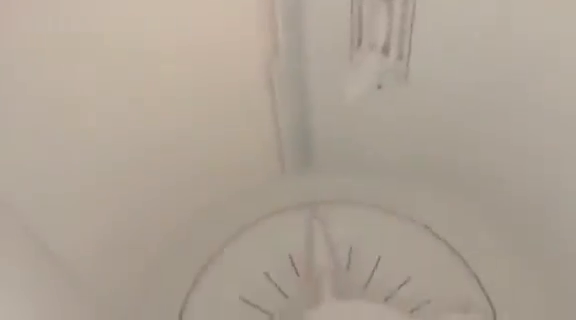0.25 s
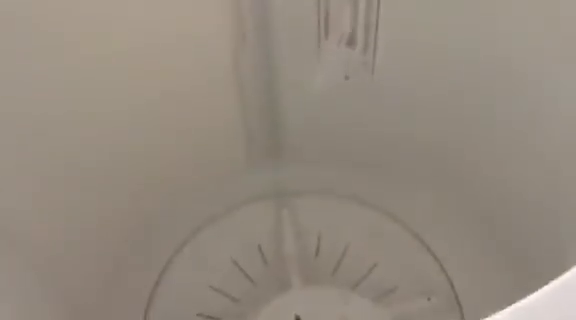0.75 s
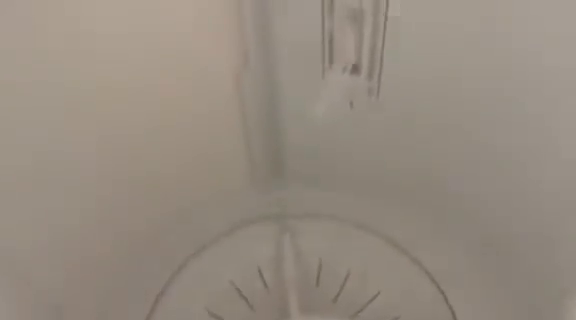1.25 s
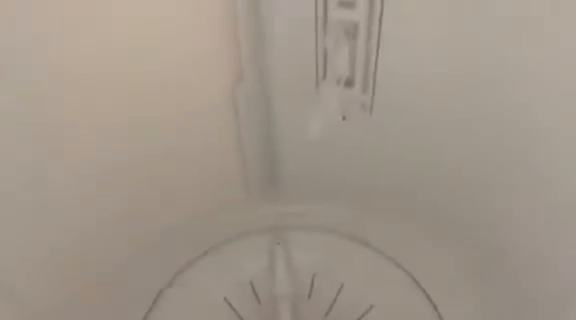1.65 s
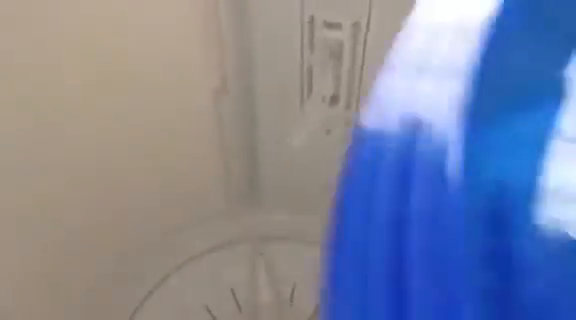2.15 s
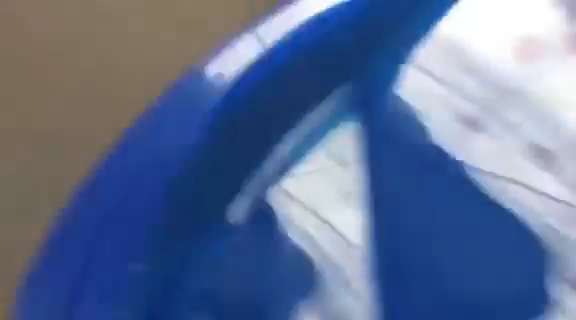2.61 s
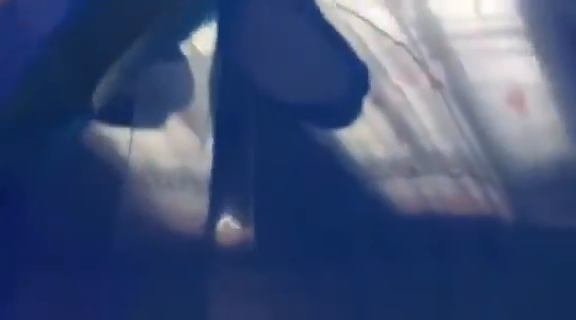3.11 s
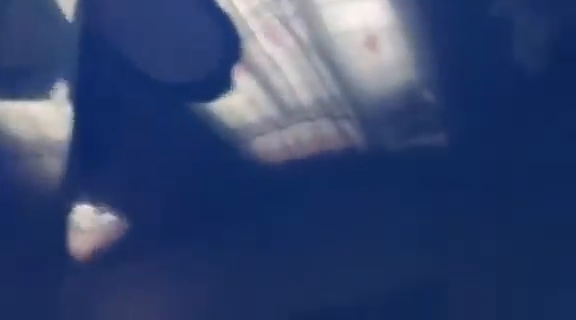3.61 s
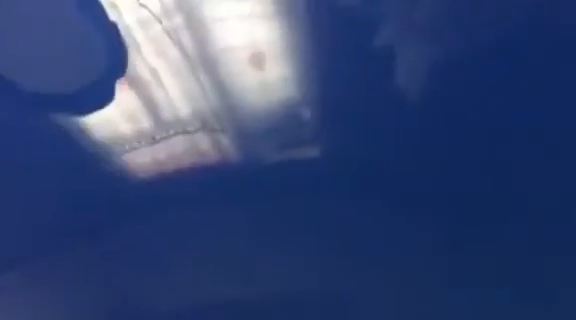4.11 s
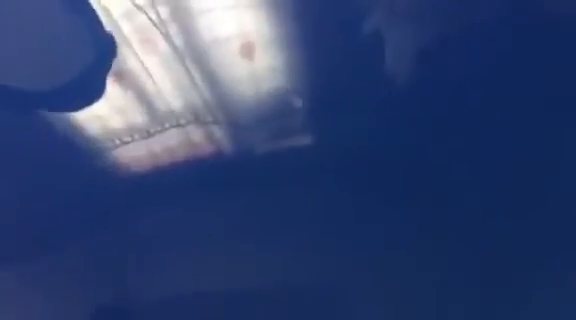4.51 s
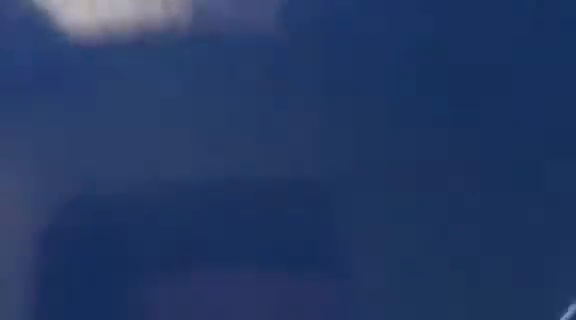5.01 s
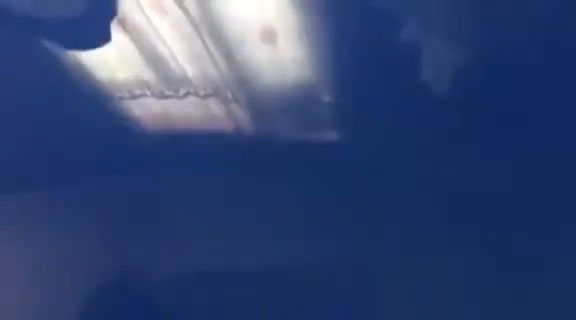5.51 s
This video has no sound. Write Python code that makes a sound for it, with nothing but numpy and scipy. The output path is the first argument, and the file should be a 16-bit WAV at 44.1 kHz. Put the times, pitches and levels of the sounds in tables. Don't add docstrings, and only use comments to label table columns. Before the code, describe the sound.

Faint distant rooster crows over a low hum, then hard plastic knocks, hollow tub thumps and scraping close to the microphone.

```python
import sys
import numpy as np
from scipy import signal
from scipy.io import wavfile
from scipy.ndimage import uniform_filter1d

SR = 44100
rng = np.random.default_rng(int(sys.argv[2]) if len(sys.argv) > 2 else 0)


def store_pcm(level_fs):
    pcm = np.round(np.clip(level_fs, -1, 1) * 32767).astype(np.int16)
    wavfile.write(sys.argv[1], SR, np.atleast_2d(pcm).T)


def level_to_linear(level):
    exponent = np.asarray(level, float) / 20
    return 10 ** exponent


N = 253575

# start_s, crack_level_db (rms of the first 10 ms), panel_share_db, rim_share_db,
# edge_share_db
HARD_KNOCKS = [(1.259, -29.5, -43, -7, -14), (2.141, -14.5, -45, -14.5, -21),
               (2.354, -14, -15.5, -15.5, -41), (2.443, -16, -13, -4.5, -13), (2.563, -16.5, -4, -22, -61),
               (3.876, -26, -8, 8, -10), (4.116, -22.5, -25, -10, -48), (4.189, -23.5, -7, -47, -52),
               (4.865, -17, -24, -14, -57), (5.166, -12, -25, -28, -45), (5.505, -16, -22, -16, -58)]
# start_s, crack_level_db (rms of the first 10 ms), panel_share_db, rim_share_db
LIGHT_TICKS = [(0.961, -56, -8, -15), (2.524, -32.5, -19, -11), (2.609, -30, 2, -35), (2.67, -39, 1, -15),
               (3.062, -47, -4, -11), (3.126, -42, -33, -16), (3.332, -43.5, 8, 0), (3.830, -39.5, 6, -10),
               (3.906, -34.5, -27, -30), (4.072, -51, -21, -19), (4.161, -36, -14, -11),
               (4.177, -31, -26, -23), (4.56, -37, -15, -12), (4.593, -36, 3, -14), (4.6, -35, -19, -16),
               (4.627, -35, -8, -8), (4.828, -46, -16, -7), (5.374, -41, 3, -26), (5.408, -39, 7, -16),
               (5.436, -41, -8, -7), (5.469, -37, -12, -20), (5.601, -33, -19.5, -5)]
# start_s, crack_level_db (rms of the first 10 ms), panel_share_db, rim_share_db
CREAK_TICKS = [(2.944, -48, -3, -10), (3.109, -53, -15, -8), (3.156, -59, -20, 0), (3.201, -60, -15, -10),
               (3.212, -51, -10, -6), (3.288, -56, -20, -8), (3.324, -53, -10, -6), (3.345, -52, -5, 0),
               (3.558, -59, -10, -10), (3.575, -59, -10, 0), (3.735, -55, -8, -15), (3.777, -55, -5, -15),
               (4.08, -52, -15, -15), (5.012, -55, -10, -10), (5.037, -55, -10, -8), (5.112, -54, -11, -15),
               (5.163, -28, -9, -25)]
# pitch_hz, t60_s
LID_ZONES = [(700, 0.033), (1600, 0.015), (3900, 0.026), (7500, 0.0037)]
# pitch_hz, level_db, t60_s
LID_RINGS = [(573, 6, 0.059), (731, 11.5, 0.07), (831, 8, 0.057), (1036, 7.5, 0.056), (1220, 13.5, 0.027),
             (1396, 4.5, 0.021), (1770, 4.5, 0.018), (2150, 10, 0.018), (2426, 7.5, 0.031),
             (2920, -2, 0.011), (4000, 7, 0.01), (4700, 7, .015)]
# pitch_hz, level_db, t60_s
LANDING_MODES = [(560, 0, .05), (721, 5, .055), (859, 1, .05), (1014, -3, .06), (1400, 1, .025),
                 (1920, -8, .02), (2400, -9.5, .03)]
# delay_s, level_db
LANDING_BOUNCES = [
    (.0014, 5),
    (.0056, -3),
    (.007, -2),
]
# pitch_hz, width_hz, level_db
TUB_MODES = [
    [(61.6, 12.3, -3.5), (74.5, 23.3, -6)],
    [(102.4, 13.2, 1), (121.1, 10.1, 3.5), (147.3, 20.8, -2)],
    [(184.8, 37, -1), (226.5, 30.8, 1.5), (266.2, 40, -1), (314.8, 38.6, -1.5), (397.2, 43.6, -3.5)],
]
# start_s, boom_db, drum_db, wall_db, struck_spot_hz
HEAVY_THUMPS = [(1.26, -43, -46, -45, 285), (2.138, -34, -35, -24, 354), (2.354, -39, -17.5, -14.5, 234),
                (2.443, -26, -23.5, -33, 256), (2.562, -31.5, -23, -37, 223), (3.062, -60, -42.5, -35, 231),
                (3.332, -43, -46, -35.5, 225), (4.116, -42, -39, -34, 192), (4.189, -30.5, -33, -25, 344),
                (4.419, -39, -50, -40, 222), (4.566, -44, -30, -32, 396), (4.592, -33, -35, -39, 223),
                (4.864, -46, -28.5, -23, 267), (5.165, -41, -26, -17.5, 226),
                (5.378, -33.5, -37, -36.5, 205), (5.505, -23.5, -24, -25.5, 199)]
# start_s, peak_db,
# pitch_hz, t60_s
SOFT_BUMPS = [(2.353, -20.5, 195, .2), (2.362, -23.5, 408, 0.11), (2.366, -30.5, 532, .08),
              (2.36, -31, 1183, 0.075), (2.396, -16, 95, .25), (2.39, -28.5, 349, 0.14),
              (2.447, -22, 189, .12), (2.468, -30.5, 400, 0.094), (2.478, -20, 114.8, .3),
              (2.515, -34.5, 211, .2), (2.566, -25.5, 221, .25), (2.57, -30, 323, 0.1),
              (2.572, -33, 548, .16), (2.576, -17, 112.5, 0.34), (2.611, -20, 113, 0.21),
              (2.625, -30, 210.5, 0.22), (2.562, -25, 65, .5), (2.564, -22, 140, .15),
              (2.61, -32.5, 420, 0.092), (2.645, -33, 345, .15), (3.64, -50, 338, .1),
              (3.666, -40, 140, 0.22), (3.744, -44, 400, .1), (3.765, -41, 300, .1), (3.781, -28, 110, .6),
              (3.7, -40, 68, .8), (3.72, -42.5, 200, .2), (3.82, -34, 199, 0.13), (3.83, -32, 70, 0.56),
              (3.775, -55.5, 650, 0.11), (3.835, -33.5, 358, .1), (3.854, -31, 390, 0.13),
              (3.908, -23, 99.8, 0.24), (3.97, -40, 70, .3), (4.045, -57, 620, .06), (4.056, -44, 380, .1),
              (4.112, -28, 104.8, 0.23), (4.133, -33.5, 291, .08), (4.192, -29, 339, .1),
              (4.12, -31, 200, .1), (4.175, -31, 201, .1), (4.895, -38, 65.4, .5),
              (5.168, -4.5, 67, 0.26), (5.166, -15, 140, .15), (5.166, -20.5, 299, .1),
                  (5.238, -19.5, 114.7, 0.21), (5.178, -24.5, 361, 0.17), (5.18, -26, 194, 0.25),
                  (5.186, -30, 2250, 0.06), (5.197, -33, 900, .08), (5.233, -33, 618, .1),
                  (5.252, -26.5, 150, 0.11), (5.283, -30, 170, .12), (5.316, -41.5, 560, .08),
                  (5.373, -38, 588, .08), (5.384, -38, 572, .08), (5.409, -33.5, 602, .07),
                  (5.4, -35, 210, .15), (5.415, -38, 340, .1), (5.44, -24, 125.7, 0.27),
                  (5.483, -41, 620, .06), (5.497, -22, 130.3, .12), (5.452, -26, 170, 0.16),
                  (5.478, -25, 199.5, .2)]
# time_s, level_db
SLIDE_PRESSURE = [(2.3, -93), (2.6, -48), (2.72, -37.5), (3.27, -45), (3.58, -46.5), (4.0, -55),
                  (4.38, -73), (4.53, -47), (4.78, -51), (4.94, -40), (5.12, -38), (5.36, -55),
                  (5.75, -68.5)]
SLIDE_SHARES_DB = [-5.5, -0.05, -8, -23.5]
# peak_s, rise_s, level_db, place (0 boom, 1 drum, 2 wall), t60_s
LID_SHOVES = [(1.28, 0.037, -35, 1.32, 0.31), (1.35, 0.057, -37, 0.31, 0.51),
              (2.149, 0.02, -28.5, 1.94, 0.19), (2.18, 0.026, -27.5, 0.66, 0.39),
              (2.419, 0.078, -14.5, .05, 0.16), (2.46, 0.042, -25, 1.11, 0.29),
              (2.59, 0.069, -23.5, 1.52, 0.39), (3.37, 0.087, -30.5, 0.4, .35),
              (3.871, 0.27, -22, 1.22, 0.34), (3.95, .05, -29.5, 0.36, 0.12),
              (4.09, 0.068, -22.5, 1.08, 0.36), (4.13, .04, -24, 0.76, .15), (4.21, 0.051, -22, 1.23, 0.22),
              (4.44, 0.046, -37, 1.37, 0.51), (4.57, 0.037, -22, .05, 0.38), (4.6, 0.04, -25.5, 1.83, 0.26),
              (4.87, .05, -26, 1.71, 0.24), (5.2, .03, -28.5, .1, .33), (5.21, .03, -25, 1.7, 0.4),
              (5.3, .05, -26, 1.06, 0.1), (5.39, 0.028, -31, 0.64, 0.38), (5.47, 0.076, -23.5, 1.42, 0.32),
              (5.529, 0.034, -27.5, 1.78, 0.28), (5.6, .03, -29, 0.66, 0.33)]
# pitch_hz, level_db (per Hz)
SCRAPE_SPECTRUM = [(240, -38), (400, -11), (611, -6), (1060, -14), (1120, -10.5), (2460, -17), (2750, -19),
                   (9280, -36), (10500, -40.5), (13600, -69), (22000, -120)]
# start_s, length_s, level_db,
# centre_hz, width_hz
BRUSHES_AND_RUBS = [(0.39, 0.55, -79.5, 3000, 1500), (1.548, 0.17, -75.5, 2000, 2500),
                    (2.1, 0.051, -75.5, 3500, 2300), (2.151, 0.27, -70, 2020, 330), (2.146, 0.21, -63, 1230, 230),
                    (3.865, 0.075, -55, 3700, 4000), (3.7, .06, -76, 1500, 1800), (3.32, .07, -68, 3000, 4000),
                    (5.3, 0.09, -60, 1200, 1500), (5.511, 0.085, -52, 4500, 1900), (5.504, .007, -33, 3960, 530),
                    (5.599, .006, -50, 3900, 640), (3.875, .011, -43, 4200, 2000), (4.115, .008, -50, 4100, 1600),
                    (2.443, .03, -40, 2540, 1100), (2.565, 0.038, -45.5, 3040, 1900),
                    (2.88, 0.12, -64.5, 2100, 1700), (2.2, 0.047, -60.5, 810, 620), (3, 0.026, -64, 2360, 820),
                    (3.783, .009, -70, 4100, 800), (4.95, .2, -74, 3500, 160), (4.42, .21, -79, 3300, 250),
                    (5.375, .12, -52.5, 630, 600), (5.52, 0.14, -55.5, 850, 1200), (5.405, .1, -52.5, 1500, 2300),
              (6.8, .025, -57.5, 4400, 6000), (2.14, 0.037, -34.5, 2170, 470),
              (2.141, .04, -37.5, 1270, 250), (2.143, 0.024, -47, 4000, 3000),
              (4.565, 0.076, -57, 1400, 1900), (5.15, 0.022, -50, 800, 900), (5.503, .016, -32, 1150, 300),
              (2.352, .05, -36, 450, 220), (2.566, .12, -46.5, 900, 1140), (5.362, 0.054, -55.5, 1120, 720),
              (5.478, 0.029, -49, 1250, 1500), (5.22, 0.078, -49.5, 1050, 660),
              (2.58, 0.049, -41, 1060, 370), (2.695, .07, -54, 610, 300), (3.835, 0.034, -58.5, 1300, 2700),
              (3.915, 0.028, -55, 1130, 500), (4.598, 0.022, -48, 650, 300), (4.168, .02, -47, 1080, 400),
              (2.16, 0.063, -39.5, 357, 150), (2.165, 0.029, -45, 2200, 430), (3.06, .07, -67, 2400, 830)]
# start_s, length_s,
# start_hz, end_hz, level_db
ROOSTER_CROWS = [
    [(.01, .2, 1717, 1782, -56.5), (.2, .23, 1770, 1745, -60), (.42, .23, 1755, 1806, -58),
     (.64, 0.18, 1787, 1748, -60.5), (.83, .14, 1740, 1810, -56.5), (4.39, 0.19, 1846, 1830, -63.5),
     (5.7, .06, 1800, 1770, -69)],
    [(.26, .17, 2035, 1997, -57), (.48, 0.32, 1957, 1870, -55.5), (.88, 0.39, 1869, 1670, -58)],
    [(4.645, .11, 1974, 1955, -60), (4.75, .2, 1960, 1970, -68), (4.92, .27, 1963, 1973, -63.5)],
    [(.1, .3, 1250, 1230, -78), (.73, 0.17, 1260, 1250, -76.5), (1.01, 0.4, 1163, 1170, -69),
     (1.52, 0.38, 1037, 948, -74), (1.45, .3, 1190, 1090, -78)],
]
OCTAVE_BELOW_DB = [-15.5, -10.5, -5, -32]
# start_s, length_s, start_hz, end_hz, level_db
BIRD_CHIRPS = [(0.189, 0.21, 4050, 6600, -77.5), (0.983, 0.19, 4400, 6700, -79),
               (1.952, 0.22, 3980, 6150, -77.5), (3.315, 0.205, 3450, 6700, -78.5),
               (4.19, 0.12, 4660, 6800, -83), (4.992, 0.15, 4450, 6500, -77)]
# pitch_hz, t60_s
ROOM_DECAY = [(400, 0.34), (1000, 0.15), (2500, 0.29), (5000, 0.31), (10000, 0.26)]
# pitch_hz, level_db (per Hz)
HUM_SPECTRUM = [(20, -36.5), (40, -11.5), (62, 3), (110, -1), (160, -9), (250, 0), (330, -11.5),
                (480, -22.5), (750, -25), (1300, -30.5), (2750, -35.5), (6000, -42.5), (10500, -48),
                (14000, -85)]

LANDING_S, LANDING_DB = 5.1665, -9.5
EDGE_BELOW_RIM_DB = -22
BUMP_RISE_CYCLES = 1.2
RISE_DB, AWAY_DB, GRIT_DB = 27, -12, -22.5
SLOW_GRIT_DB_PER_S = -24.5
ARCH, ONSET_SHARE, FADE_DB = 0.028, 0.1, -4
HUM_DB = -56.5
MIC_EDGE_HZ = 10550


def evened(x):
    return x / np.sqrt(np.mean(x ** 2) + 1e-20)


def steadied(x, size, depth=0.68):
    power = uniform_filter1d(x ** 2, size) + 1e-3 * np.mean(x ** 2)
    return evened(x / power ** (depth / 2))


def wander(count, size):
    return evened(uniform_filter1d(rng.standard_normal(count), size))


def progress(length_s):
    return np.arange(0, length_s, 1 / SR) / length_s


def read(points, hz):
    f, value = np.transpose(points)
    return np.interp(np.log(hz + 1), np.log(f + 1), value)


def add(mix, s, sound):
    part = mix[round(s * SR):][:len(sound)]
    part += sound[:len(part)]


def resonate(x, hz, width):
    turn = np.exp(2j * np.pi * np.cumsum(hz * np.ones(len(x))) / SR)
    r = np.exp(-np.pi * width / SR)
    return 2 * (turn * signal.lfilter([1 - r], [1, -r], x / turn)).real


def ring(force, modes):
    hz, width, db = np.transpose(modes)
    r = np.exp(-np.pi * width / SR)
    poles = r * np.exp(2j * np.pi * hz / SR)
    out = 0
    for k, pole in enumerate(poles):
        mode = 2 * signal.lfilter([1 - r[k]], [1, -pole], force).real
        out = out + (-1) ** k * level_to_linear(db[k]) * mode
    return out


def modal(hz, db, t60):
    t = np.arange(1536) / SR
    decay = level_to_linear(db[:, None] - 60 * t / t60[:, None])
    return (decay * np.sin(2 * np.pi * hz[:, None] * t)).sum(0)


def coloured(points, patchy_db):
    a, b, patches = rng.standard_normal((N // 256 + 5, 513, 3)).T
    patches = evened(uniform_filter1d(uniform_filter1d(patches, 8, 0), 10, 1))
    level_db = read(points, np.fft.rfftfreq(1024, 1 / SR))[:, None] + patchy_db * patches
    noise = signal.istft((a + 1j * b) * level_to_linear(level_db), nperseg=1024, noverlap=768)[1]
    return evened(noise[:N])


def crack(zone_db, rattle_s=0.0043, tail_db=-15.0, tail_t60=0.18):
    t = np.arange(SR // 5) / SR
    force = rng.standard_normal(SR // 40) ** 3 * np.exp(-t[:SR // 40] / rattle_s)
    force[0] += 0.38 * abs(force).max()
    force = force / np.linalg.norm(force)

    zones = list(zip(np.transpose(LID_ZONES)[0], zone_db))
    pitch_luck, level_luck = rng.standard_normal((2, 90))
    dense_hz = np.geomspace(450, 10500, 90) * (1 + 0.05 * pitch_luck)
    dense_db = read(zones, dense_hz) + 2 * level_luck
    dense = modal(dense_hz, dense_db, read(LID_ZONES, dense_hz))
    hz, db, t60 = np.transpose(LID_RINGS)
    clear_db = db + read(zones, hz) + 4.0 * level_luck[:len(hz)]
    clear = modal(hz * (1 + 0.018 * pitch_luck[:len(hz)]), clear_db, t60)

    shiver = level_to_linear(tail_db - 60 * t / tail_t60) * np.minimum(t / 0.0065, 1)
    shiver = shiver * rng.standard_normal(len(t)) / 10
    sound = signal.fftconvolve(shiver, dense + 1.13 * clear)[:len(t)]
    add(sound, 0, signal.fftconvolve(force, dense + clear))
    return 0.22 * sound / np.sqrt(np.mean(sound[:SR // 100] ** 2))


def lid_cracks():
    out = np.zeros(N)
    for s, crack_db, panel_db, rim_db, edge_db in HARD_KNOCKS:
        add(out, s, level_to_linear(crack_db) * crack((panel_db, 0, rim_db, edge_db)))
    add_ticks(out, LIGHT_TICKS)
    landing = modal(*np.transpose(LANDING_MODES))
    landing = landing / abs(landing).max()
    for later_s, db in [(0.0005, 0)] + LANDING_BOUNCES:
        add(out, LANDING_S + later_s, level_to_linear(LANDING_DB + db) * landing)
    return out


def add_ticks(mix, ticks):
    for s, crack_db, panel_db, rim_db in ticks:
        add(mix, s, level_to_linear(crack_db) * crack((panel_db, 0, rim_db, rim_db + EDGE_BELOW_RIM_DB)))


def thump(modes, push_s):
    t = np.arange(SR // 3) / SR
    sound = ring(np.exp(-t / push_s) * np.minimum(t / 0.00076, 1), modes)
    return sound / abs(sound).max()


def tub_thumps():
    out = np.zeros(N)
    boom, drum, wall = (thump(modes, push_s) for modes, push_s in zip(TUB_MODES, (0.004, 0.003, 0.0012)))
    for s, boom_db, drum_db, wall_db, spot_hz in HEAVY_THUMPS:
        thud = 0.47 * wall + thump([(spot_hz, 35, 0)], 0.0013)
        add(out, s, level_to_linear(boom_db) * boom + level_to_linear(drum_db) * drum + level_to_linear(wall_db - 1.0) * thud)
    return out


def bumps():
    out, t = np.zeros(N), np.arange(SR // 3) / SR
    for s, db, hz, t60 in SOFT_BUMPS:
        swell = level_to_linear(db - 60 * t / t60) * np.minimum(t * hz / BUMP_RISE_CYCLES, 1)
        add(out, s, swell * np.sin(2 * np.pi * hz * t))
    return out


def drag():
    t = np.arange(N) / SR
    lumps = level_to_linear(2.93 * wander(N, 600))
    layers = []
    for modes in TUB_MODES:
        shake = ring(ring(rng.standard_normal(N) * lumps, modes), modes)
        layers.append(level_to_linear(-3.5) * steadied(shake, size=2000))
    slips = level_to_linear(4.8 * np.minimum(rng.exponential(1, N), 4)) * (rng.random(N) < 40 / SR)
    grit = 1 + 0.29 * signal.lfilter([1], [1, -np.exp(-1 / (0.0016 * SR))], slips)
    layers.append(evened(coloured(SCRAPE_SPECTRUM, 1.9) * grit))

    pressure = level_to_linear(np.interp(t, *np.transpose(SLIDE_PRESSURE)))
    power = np.outer(level_to_linear(np.array(SLIDE_SHARES_DB)), pressure) ** 2
    layer_place = np.array([0.15, 1.054, 2.0, 1.92])
    for s, rise_s, db, place, t60 in LID_SHOVES:
        span = slice(round((s - 2 * rise_s) * SR), round((s + t60) * SR))
        since = t[span] - s
        swell_db = db + np.minimum(RISE_DB * since / rise_s, -60 * since / t60)
        share_db = AWAY_DB * abs(layer_place - place)
        share_db[3] += GRIT_DB + SLOW_GRIT_DB_PER_S * rise_s
        power[:, span] += level_to_linear(swell_db + share_db[:, None]) ** 2
    return (np.sqrt(power) * layers).sum(0)


def scuffs():
    out = np.zeros(N)
    for s, length, db, hz, width in BRUSHES_AND_RUBS:
        u = progress(length)
        grit = rng.standard_normal(len(u)) * level_to_linear(4.0 * wander(len(u), 90))
        band = evened(resonate(resonate(grit, hz, width), hz, width))
        add(out, s, level_to_linear(db) * band * np.sin(np.pi * u ** 0.54))
    return out


def creaks():
    out = np.zeros(N)
    add_ticks(out, CREAK_TICKS)
    return out


def husky_band(count, hz, width):
    band = resonate(resonate(rng.standard_normal(count), hz, width), hz, width)
    return steadied(band, size=700, depth=0.82)


def roosters():
    out = np.zeros(N)
    for syllables, low_db in zip(ROOSTER_CROWS, OCTAVE_BELOW_DB):
        for s, length, start_hz, end_hz, db in syllables:
            u = progress(length)
            hz = (start_hz + (end_hz - start_hz) * u) * (1 + ARCH * np.sin(np.pi * u))
            voice = level_to_linear(low_db) * husky_band(len(u), hz / 2, 40)
            voice += husky_band(len(u), hz, 42)
            voice += level_to_linear(-30.5) * husky_band(len(u), 1.5 * hz, 42)
            voice += level_to_linear(-9) * husky_band(len(u), 1.017 * hz, 300)
            flutter = level_to_linear(3.0 * wander(len(u), 500))
            swell = level_to_linear(db + FADE_DB * u ** 2) * np.minimum(u / ONSET_SHARE, 1)
            add(out, s, swell * flutter * voice * signal.windows.tukey(len(u), 0.12))
    return out


def bird():
    out = np.zeros(N)
    for s, length, start_hz, end_hz, db in BIRD_CHIRPS:
        u = progress(length)
        hz = start_hz + (end_hz - start_hz) * u ** 0.94
        whistle = evened(resonate(rng.standard_normal(len(u)), hz, 420))
        add(out, s, level_to_linear(db) * whistle * signal.windows.tukey(len(u), 0.4))
    return out


def room(x):
    hz, t, z = signal.stft(rng.standard_normal(SR // 2), SR, nperseg=128)
    tail = signal.istft(z * level_to_linear(-60 * t / read(ROOM_DECAY, hz)[:, None]), SR, nperseg=128)[1]
    tail = tail * np.minimum(np.arange(len(tail)) / (0.004 * SR), 1)
    return signal.fftconvolve(x, tail / np.linalg.norm(tail))[:N]


def hum():
    return level_to_linear(HUM_DB) * coloured(HUM_SPECTRUM, 0.73)


def scene():
    cracks, thumps = lid_cracks(), tub_thumps() + bumps()
    calls, chirps = roosters(), bird()
    wet = room(level_to_linear(-8.5) * cracks + level_to_linear(-14.5) * thumps + level_to_linear(-5.5) * calls + level_to_linear(1.5) * chirps)
    near = cracks + thumps + drag() + scuffs() + creaks()
    far = level_to_linear(-3.0) * calls + chirps + hum()
    return (near + far + wet)[None]


def roll_off(x):
    return signal.sosfilt(signal.butter(12, 10980, fs=SR, output="sos"), x)


def record(dry):
    x = signal.sosfilt(signal.butter(3, 50, "high", fs=SR, output="sos"), dry)
    treble_cut = signal.firwin(255, MIC_EDGE_HZ, window=("kaiser", 5), fs=SR)
    x = signal.oaconvolve(x, treble_cut[None], "same")
    return roll_off(x)


dry = scene()
out = record(dry)
store_pcm(out)
```